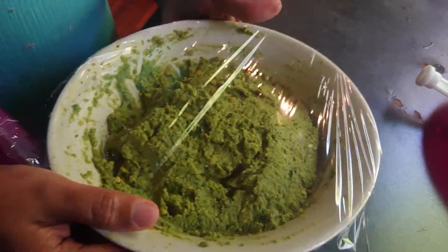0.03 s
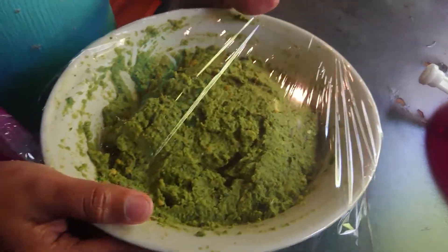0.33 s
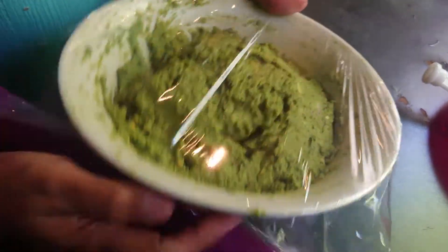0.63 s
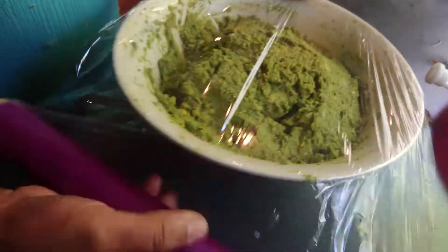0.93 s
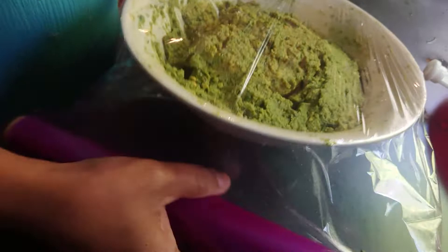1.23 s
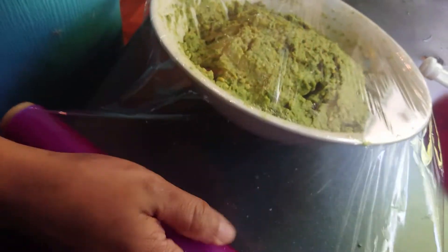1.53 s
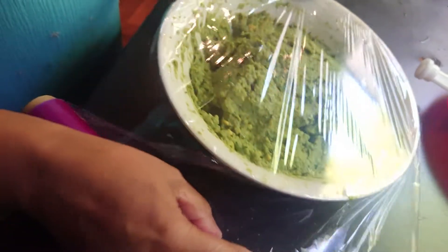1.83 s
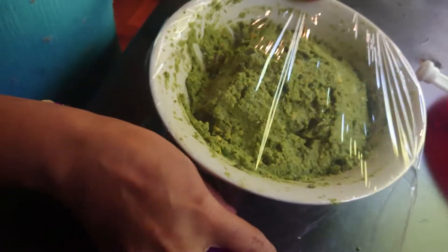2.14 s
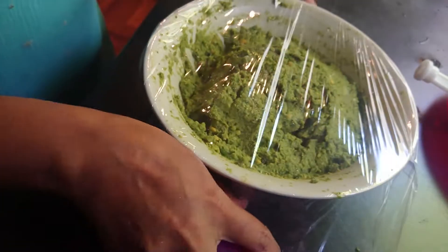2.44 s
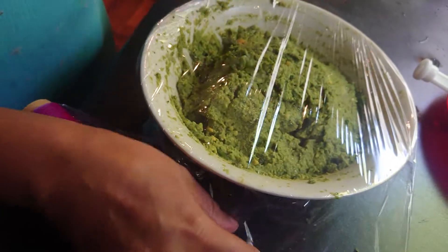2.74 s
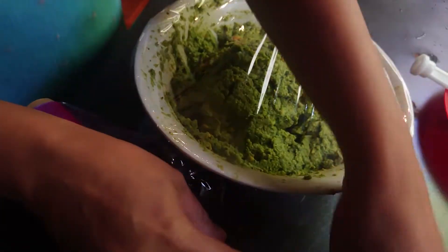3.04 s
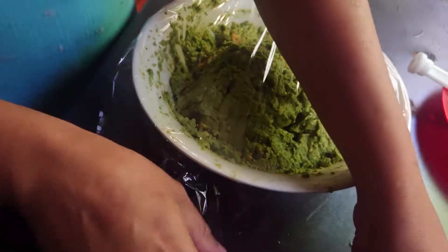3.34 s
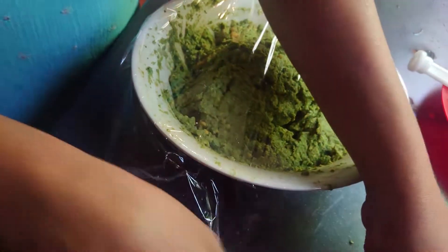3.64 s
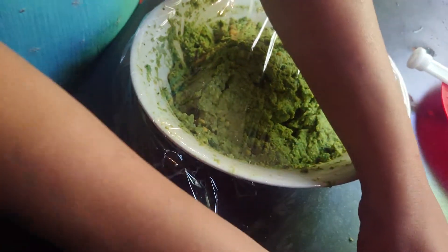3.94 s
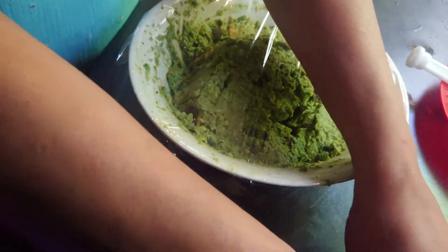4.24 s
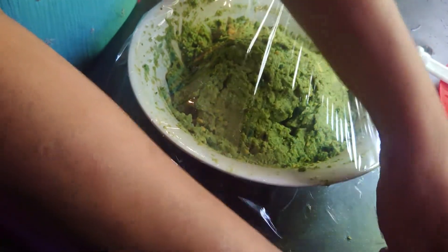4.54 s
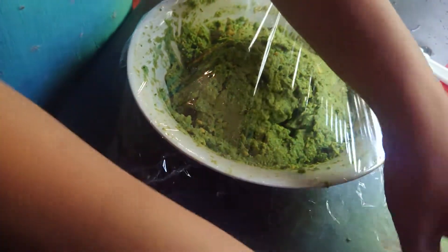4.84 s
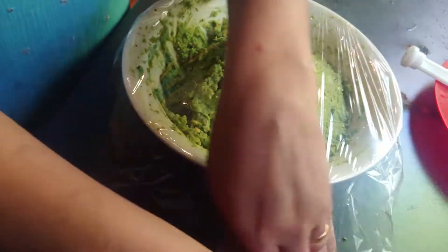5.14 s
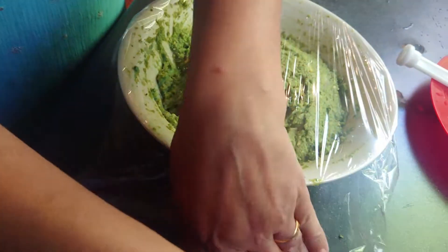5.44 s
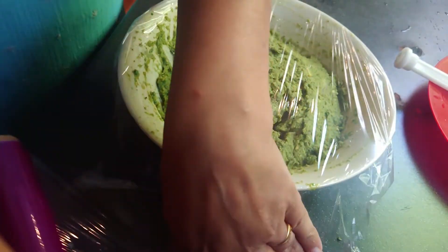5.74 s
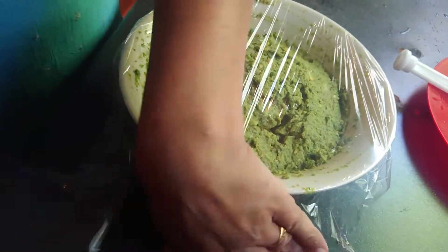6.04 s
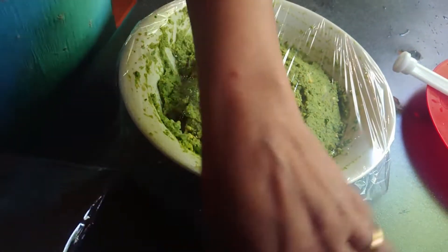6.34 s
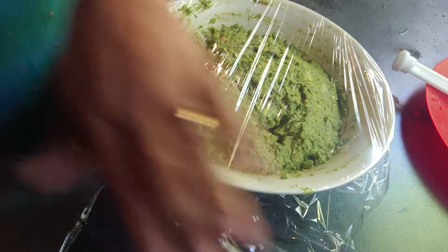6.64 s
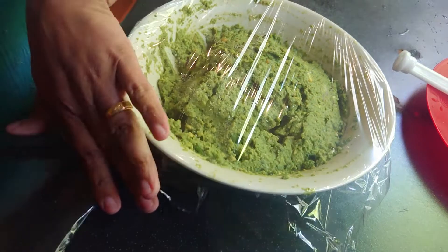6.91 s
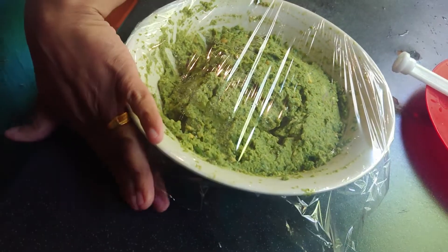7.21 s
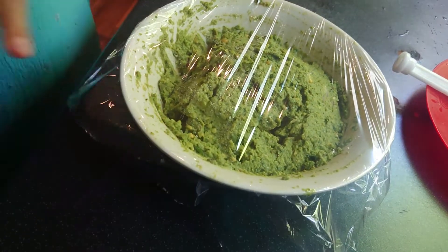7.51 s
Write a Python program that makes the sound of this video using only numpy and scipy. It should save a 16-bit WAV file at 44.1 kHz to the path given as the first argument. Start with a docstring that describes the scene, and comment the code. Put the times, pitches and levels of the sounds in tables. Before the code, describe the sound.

Plastic cling film is stretched over a bowl, heard close up in a small, slightly echoing kitchen. Soft rustling and rubbing run throughout over a faint low rumble. The loose film crinkles at about 0.7 seconds, and a soft knock on the counter follows at 1 second. The taut sheet then jerks free with sharp, hollow pops like a slack drum at about 1.3, 1.9, 2.4 and 3.5 seconds, the last with a bright crack. At 3.1 seconds the film gives a short, high squeak on the rim. A faint creak and crinkle come near 4.4 seconds. The film squeaks under a pulling hand at 5.6 seconds, then gives a lower, rough creak at 6 seconds amid a cluster of dull knocks from bowl and roll. A light bump comes at 6.6 seconds and one more high squeak at 7, before the crackling thins out.

```python
"""Cling film is pulled off its roll and stretched over a bowl in a small, live kitchen, close to a phone.
First the loose film rustles and crinkles as its folds buckle; bowl and roll knock softly on the counter.
From 1.3 s to 3.5 s the taut sheet jerks free four times, popping like a slack drum as clinging edges
crack apart; at 3.1 s it squeaks on the rim by stick-slip friction. It creaks at 4.4 s, then slips under
the pulling hand (5.6 s), the palm (6 s) and the fingers (7 s), while rustling and knocking go on."""
import sys
import numpy as np
from scipy import signal
from scipy.fft import rfft, irfft, next_fast_len
from scipy.io import wavfile
from scipy.ndimage import uniform_filter1d

SR = 44100
rng = np.random.default_rng(int(sys.argv[2]) if len(sys.argv) > 2 else 0)


def generate_wav(sig):
    """Save sig (samples, or channels by samples) to the path in sys.argv[1] as 16-bit PCM at SR."""
    pcm = np.round(np.clip(np.atleast_2d(sig).T, -1, 1) * 32767).astype(np.int16)
    wavfile.write(sys.argv[1], SR, pcm)


N = 342657
T = np.arange(N) / SR
SHORT = T[:16384]  # time axis of one brief event [s]
TOP_HZ = 16000
LEFT_RIGHT = np.array([[1], [-1]])


def undb(db):
    """Amplitude ratio of a level in decibels."""
    return 10 ** (np.asarray(db) / 20)


def unit(x):
    """Normalisation to an rms of 1."""
    return x / np.sqrt(np.mean(x ** 2) + 1e-30)


def at_energy(x, db):
    """Energy normalisation: a transient gets the energy of 10 ms at the given level."""
    return x * undb(db) / np.sqrt(np.sum(x ** 2) / (SR / 100))


def along(curve, t):
    """Linear interpolation of (time, value) points."""
    return np.interp(t, *np.transpose(curve))


def by_hz(points, hz):
    """Interpolation of (frequency, value) points on a logarithmic frequency axis."""
    f, value = np.transpose(points)
    return np.interp(np.log(np.maximum(hz, 1)), np.log(f), value)


def colour(x, points):
    """Spectral shaping by (frequency, gain) points."""
    size = next_fast_len(x.shape[-1])
    gain = undb(by_hz(points, np.fft.rfftfreq(size, 1 / SR)))
    return irfft(rfft(x, size) * gain, size)[..., :x.shape[-1]]


def resonate(x, hz, q):
    """Forced response of a damped oscillator: a two-pole band-pass."""
    return signal.lfilter(*signal.iirpeak(min(hz, SR / 3), max(q, hz / SR * 3), fs=SR), x)


def cut(x, hz, kind, order):
    """Band limiting by a maximally flat filter."""
    return signal.sosfilt(signal.butter(order, hz, kind, fs=SR, output="sos"), x)


def add(out, s, x, pan_db=0, lag_s_per_db=6e-5):
    """Superposition from time s on: the nearer microphone receives the sound louder and sooner."""
    for channel, side in zip(out, (1, -1)):
        i = max(int((s - side * pan_db * lag_s_per_db / 2) * SR), 0)
        part = x[:N - i]
        channel[i:i + len(part)] += undb(side * pan_db / 2) * part


def clicks(per_s, spread_db, size):
    """Shot noise of buckling: impulses at random moments, many small and a few large."""
    heights = undb(spread_db * np.minimum(rng.exponential(size=size), 5))
    signs = rng.choice([-1, 1], size)
    return heights * signs * (rng.random(size) < per_s / SR)


def whiten(response, smooth_bins=50):
    """Minimum-phase equalisation: flattens a response's broad colour and keeps its fine echo pattern."""
    length = response.shape[-1]
    spectrum = rfft(response)
    power = uniform_filter1d(abs(spectrum) ** 2, smooth_bins)
    cepstrum = irfft(-np.log(power) / 2, length)
    cepstrum *= 1 + np.sign(np.fft.fftfreq(length))  # causal part only
    return irfft(spectrum * np.exp(rfft(cepstrum)), length)


# Spectrum of the still air: (frequency [Hz], relative level [dB])
AIR_SPECTRUM = [(30, -10.5), (70, -21), (200, -1), (500, -3.5), (1000, -1.5), (4000, -9.5), (8000, -31.5),
                (16000, -15.5)]
# Spectrum of the counter's rumble: (frequency [Hz], relative level [dB])
RUMBLE_SPECTRUM = [(20, -17), (40, -5.5), (65, 1.5), (90, -8.5), (170, -12), (260, -19.5), (600, -34.5),
                   (2000, -58.5)]
# Envelope of that rumble: (time [s], relative level [dB])
RUMBLE_LEVELS = [(0.0, -62.5), (0.43, -71), (2.14, -66.5), (3.05, -72.5), (3.53, -63.5), (3.89, -70),
                 (5.93, -71.5), (6.14, -71), (6.36, -67), (7.77, -76)]
def background(rumble_gain_db=4, air_db=-71, side_db=-15):
    """Random vibration: things shifting on the counter rumble over the noise floor of the room."""
    mid, side = unit(colour(rng.standard_normal((2, N)), RUMBLE_SPECTRUM))
    rumble = (mid + undb(side_db) * side * LEFT_RIGHT) * undb(along(RUMBLE_LEVELS, T) + rumble_gain_db)
    air = undb(air_db) * unit(colour(rng.standard_normal((2, N)), AIR_SPECTRUM))
    return rumble + air


# Reverberation of the kitchen: (frequency [Hz], time to fall 60 dB [s])
REVERB_TIMES = [(60, 0.75), (200, .42), (600, 0.38), (1500, 0.41), (5000, 0.32), (14000, 0.51)]
# Its standing waves: (frequency [Hz], relative level [dB], time to fall 60 dB [s])
ROOM_MODES = [(65, -2, 0.45), (170, 11.5, .42), (308, 2, 0.42), (338, -3, .36), (705, -1.5, .34),
              (875, -3, 0.2)]
def kitchen(x, early_db, tail_db, modes_db, early_s, coherence_hz, build_s=0.013):
    """Convolution with the room: direct sound, reflections off counter and bowl, tail, standing waves."""
    t = T[:SR // 2]
    hz = np.fft.rfftfreq(len(t), 1 / SR)
    mid, side = rfft(rng.standard_normal((2, len(t))))
    coherence = 1 / (1 + (hz / coherence_hz) ** 2)  # long waves reach both microphones alike
    field = mid * np.sqrt(1 + coherence) + side * np.sqrt(1 - coherence) * LEFT_RIGHT
    response = np.zeros((2, len(t)))
    edges = np.r_[0, np.geomspace(120, SR / 2, 16)]
    for lo, hi in zip(edges, edges[1:]):
        band = irfft(field * ((hz >= lo) & (hz < hi)), len(t))
        early = band * t * np.exp(-2 * t / early_s)
        t60 = by_hz(REVERB_TIMES, (lo + hi) / 2)
        tail = band * (1 - np.exp(-t / build_s)) * np.exp(-np.log(1000) * t / t60)
        band_weight = np.sqrt((hi - lo) / (SR / 2) / len(t))
        response += (undb(early_db) * unit(early) + undb(tail_db) * unit(tail)) * band_weight
    response[:, 0] += 1  # direct sound
    response = whiten(response)
    for mode_hz, db, t60 in ROOM_MODES:
        loss = np.log(1000) / t60
        ring = np.exp(-loss * t) * np.sin(2 * np.pi * mode_hz * t)
        response += undb(db + modes_db) * 2 * loss / SR * ring
    return signal.oaconvolve(x, response, axes=1)[:, :N]


def swell(s, length, rise_share=.52):
    """Power envelope of a hand stroke: a bell curve peaking at time s."""
    width = length * np.where(T < s, rise_share, 1 - rise_share)
    return np.exp(-np.minimum(abs(T - s) / width, 10) ** 2)


# Where the hands work the film: (time [s], left minus right [dB])
HAND_PAN = [(0, -1.5), (.7, 2), (1.0, -2), (5.3, -3), (5.7, -1.5), (6.1, -5.5), (6.5, 2.5), (7.7, -2)]
# Strokes on the loose film: (peak time [s], relative crackle [dB], length [s], relative rub [dB])
HAND_STROKES = [(.03, -63, .06, -70.5), (0.354, -65, .07, -90), (.50, -74, .06, -82),
                (0.642, -59.5, .07, -85), (0.725, -55.5, .05, -67), (0.967, -62, .08, -64),
                (1.19, -68.5, .04, -69), (1.288, -68.5, .05, -64), (1.481, -66, .12, -67),
                (1.717, -66, .05, -70), (2.211, -65, .08, -66), (2.31, -64.5, .07, -81),
                (2.40, -70.5, .05, -75), (2.632, -61.5, .06, -61.5), (2.818, -71, .08, -64.5),
                (3.17, -65.5, 0.11, -63), (3.425, -57, .05, -67), (3.97, -69.5, .06, -77),
                (4.239, -69.5, .1, -63), (4.452, -74.5, .09, -69), (4.623, -63, .04, -58),
                (4.70, -65.5, .07, -68.5), (4.865, -81.5, .12, -80.5), (5.076, -82.5, .1, -69),
                (5.14, -65, .07, -70.5), (5.60, -69, .06, -65), (5.724, -63, .05, -54.5),
                (5.881, -86, 0.12, -59.5), (6.047, -59, 0.092, -62.5), (6.241, -69, .14, -89),
                (6.401, -67.5, .09, -85.5), (6.535, -79.5, .04, -63), (6.815, -66.5, .05, -60),
                (6.893, -68, .1, -85), (7.025, -65, .025, -71), (7.158, -78, 0.14, -63.5),
                (7.38, -74, .05, -73), (7.744, -67, .03, -88.5)]
def rubbing(gain_db=-6.0, rub_hz=850, usual_s=.06, slowing=.75, q=1.1, band_ratio=4.7):
    """Sliding friction: skin drags over film in dense, dull catches; a slower stroke sounds lower."""
    catches = clicks(per_s=6000, spread_db=2, size=N)
    rub = np.zeros(N)
    for s, _, length, db in HAND_STROKES:
        hz = np.clip(rub_hz * (usual_s / length) ** slowing, 300, 1800)
        drag = cut(resonate(catches, hz, q), [hz / band_ratio, hz * band_ratio], "band", order=1)
        rub += unit(drag) * undb(db + gain_db) * np.sqrt(swell(s, length))
    return rub * undb(along(HAND_PAN, T) / 2 * LEFT_RIGHT)


# Steady crackle of film that is never quite still: (time [s], relative level [dB])
STEADY_CRACKLE = [(0.0, -78), (0.26, -73.5), (0.78, -71.5), (1.77, -77.5), (2.23, -71), (2.99, -79),
                  (3.38, -72), (3.79, -80.5), (4.46, -75.5), (5.52, -84.5), (6.3, -74.5), (6.56, -86),
                  (6.79, -88), (7.01, -70), (7.44, -81), (7.77, -86.5)]
# Spectrum of the loose film: (frequency [Hz], relative level [dB])
RUSTLE_SPECTRUM = [(100, -17), (300, -18.5), (800, 2), (1500, -5), (3000, -1), (5000, -0.5), (7000, -7),
                   (11000, -8.5), (16000, -10)]
def rustle(gain_db=-6, steady_db=2.5, usual_per_s=320, spread_db=4.0, pan_db=-2.5, width_db=5.0):
    """Random buckling: three patches of loose film crackle, faster and louder when handled harder."""
    stroke_power = sum(undb(db) ** 2 * swell(s, length) for s, db, length, _ in HAND_STROKES)
    steady_power = undb(along(STEADY_CRACKLE, T) + steady_db) ** 2
    level_db = 10 * np.log10(steady_power + stroke_power)  # incoherent sources add in power
    rate = usual_per_s * undb((level_db - level_db.mean()) / 2)
    out = np.zeros((2, N))
    for place in (-1, 0, 1):
        patch = unit(colour(clicks(rate, spread_db, N) / np.sqrt(rate), RUSTLE_SPECTRUM))
        add(out, 0, patch * undb(level_db + gain_db), pan_db + place * width_db)
    return out


# Contacts of bowl, roll and hands: (time [s], relative level [dB], frequency [Hz], decay time [s])
SOFT_KNOCKS = [(.004, -51.5, 66.5, 0.029), (0.945, -53, 373, 0.0064), (.994, -40.5, 91.5, 0.0037),
               (.996, -42.5, 447, 0.0022), (1.059, -60.5, 75, 0.07), (1.517, -54.5, 454, 0.0041),
               (1.633, -61.5, 189, 0.0073), (3.104, -48, 196.5, .007), (3.367, -53.5, 151, 0.015),
               (3.4, -50, 107, .027), (3.860, -60.5, 97, 0.028), (4.374, -60, 66, 0.022),
               (5.8032, -46.5, 374, 0.0052), (5.8452, -44.5, 374, 0.0072), (5.952, -38.5, 185.3, 0.03),
               (5.975, -42, 70, 0.019), (6.017, -37, 90, 0.0084), (6.018, -44, 181, 0.016),
               (6.064, -43, 189, 0.0234), (6.107, -50, 115, 0.014), (6.16, -65, 129.4, 0.048),
               (6.252, -59, 102.5, 0.057), (6.573, -47.5, 351, 0.0047), (6.613, -54.5, 342, .012),
               (6.80, -64, 84.6, 0.014)]
def knocks(rise_cycles=0.18):
    """Damped vibration after a padded impact: a softer contact is both lower and slower to build."""
    out = np.zeros((2, N))
    for s, db, hz, decay in SOFT_KNOCKS:
        rise = 1 - np.exp(-(SHORT * hz / rise_cycles) ** 2)
        envelope = rise * np.exp(-SHORT / decay)
        add(out, s, undb(db) * envelope / envelope.max() * np.sin(2 * np.pi * hz * SHORT))
    return out


# Collapsing folds, and at 5.80 s and 5.85 s the dull knocks of the roll being set down: (time [s], relative
# level [dB], decay time [s], centre [Hz], fizz re ring [dB])
FOLDS = [(.024, -58, 0.0034, 2500, 13), (0.29, -62, .003, 1370, -13), (0.366, -58, 0.01, 1630, -26),
         (.477, -56, .008, 1240, 6), (0.728, -38, 0.0085, 2960, -3), (0.739, -38.5, 0.0049, 860, -18),
         (.991, -44, 0.01, 1204, -10), (1.513, -43.5, 0.0058, 820, -15.5), (1.632, -51, 0.0038, 1160, -23),
         (1.961, -57, .006, 1690, -12), (2.211, -58, 0.0048, 2530, -20), (2.404, -51.5, 0.0048, 1020, -20),
         (3.4379, -43, 0.0097, 905, -14.5), (4.338, -44, 0.0044, 2930, 6), (4.605, -54, 0.0079, 1390, 1),
         (4.629, -62, 0.0074, 1405, -22), (5.161, -44, 0.0026, 1480, -20), (5.31, -60.5, 0.0054, 1150, -13),
         (5.575, -56, 0.0019, 3390, -38), (5.754, -44, 0.00092, 3340, -20.5), (5.803, -52, 0.015, 810, -36),
         (5.8453, -54, 0.015, 800, -21), (6.107, -57.5, .0046, 1390, 17), (6.152, -60.5, 0.015, 1980, -24),
         (6.416, -59, 0.0015, 2580, -27), (6.753, -66, 0.005, 3460, 2.5), (6.826, -55.5, 0.0024, 1540, -2)]
def crinkles(rise_s=.0009, fold_q=1.0, top_ratio=4.8):
    """Buckling cascade: a fold gives way in a swelling and dying volley of clicks that ring it briefly."""
    out = np.zeros((2, N))
    lead = 4 * rise_s
    t = SHORT - lead
    for s, db, decay, hz, fizz_db in FOLDS:
        envelope = np.exp(-np.maximum(-t / rise_s, t / decay))
        volley = clicks(per_s=12000, spread_db=2, size=len(SHORT)) * envelope
        drive = cut(volley, [hz / 3, min(hz * top_ratio, TOP_HZ)], "band", order=2)
        sound = unit(resonate(drive, hz, fold_q)) + undb(fizz_db) * unit(volley)
        rms = np.sqrt(np.mean(envelope ** 2)) * undb(db)
        add(out, s - lead, unit(sound) * rms, along(HAND_PAN, s))
    return out


# Edges parting: (time [s], relative level [dB], centre [Hz], decay time [s], left minus right [dB])
EDGE_CRACKS = [(0.8512, -60, 7060, .0006, 2.5), (0.995, -44.5, 2700, 0.0053, -4.5),
               (1.3093, -34.5, 2000, 0.0047, 1.5), (1.3415, -42.5, 5100, 0.0011, -0.5),
               (1.917, -50, 1980, 0.0041, 1.5), (2.444, -44, 2150, 0.0035, 1),
               (3.4628, -22, 2607, 0.00084, -7.5), (4.3394, -49, 4540, 0.00061, -1.5),
               (5.3073, -52, 1480, 0.00071, -1.5), (6.1094, -52.5, 1660, 0.0029, -3.5),
               (6.441, -54, 2860, 0.0019, -2.5), (7.1967, -51.5, 4400, 0.00034, 6.5)]
def cracks(q=0.61, top_ratio=2.0):
    """Adhesive failure: a clinging edge tears away in a bright noise burst of a few milliseconds."""
    out = np.zeros((2, N))
    for s, db, hz, decay, pan_db in EDGE_CRACKS:
        burst = rng.standard_normal(len(SHORT)) * np.exp(-SHORT / decay)
        tear = cut(resonate(burst, hz, q), min(hz * top_ratio, TOP_HZ), "low", order=1)
        add(out, s, at_energy(tear, db), pan_db)
    return out


def stick_slip(path, film_hz, q, jitter, scrape_db, pan_db):
    """Relaxation oscillation: the film grips and slips, each slip a pulse into the sheet's resonance."""
    s, hz, db = np.transpose(sorted(path))
    t = np.arange(s[0], s[-1], 1 / SR)
    waver = unit(uniform_filter1d(rng.standard_normal(len(SHORT)), size=40))[:len(t)]
    rate = np.interp(t, s, hz) * (1 + jitter * waver)
    phase = 2 * np.pi * np.cumsum(rate) / SR
    slips = sum(np.cos(k * phase) * (k * rate < TOP_HZ) / np.sqrt(k) for k in np.arange(1, 25))
    scrape = rng.standard_normal(len(SHORT))[:len(t)] * (1 + np.cos(phase))  # noise at each slip
    sound = resonate(unit(slips) + undb(scrape_db) * scrape, film_hz, q)
    out = np.zeros((2, N))
    add(out, s[0], unit(sound) * undb(np.interp(t, s, db)), pan_db)
    return out


# Film slipping on the rim: (time [s], slip rate [Hz], relative level [dB])
RIM_SLIPS = [(3.1030, 3000, -55), (3.1045, 2920, -35), (3.111, 2480, -31), (3.119, 2420, -31),
             (3.122, 1950, -41), (3.133, 2100, -45), (3.137, 2380, -35), (3.142, 2420, -27.5),
             (3.145, 2400, -48)]
def rim_squeak():
    """Stick-slip friction against the bowl's rim: one short, high chirp."""
    return stick_slip(RIM_SLIPS, film_hz=2850, q=1.5, jitter=.06, scrape_db=-6.5, pan_db=0.5)


# Film slipping as it is held, pulled, pressed, fingered: (time [s], slip rate [Hz], relative level [dB])
HOLD_SLIPS = [(4.427, 1080, -50), (4.431, 1046, -44), (4.436, 1015, -58), (4.441, 985, -41.5),
              (4.446, 1035, -48), (4.452, 920, -63)]
PULL_SLIPS = [(5.6425, 1760, -40), (5.644, 2196, -32.5), (5.649, 3095, -28.5), (5.653, 2725, -43),
              (5.6555, 1745, -27.5), (5.660, 1390, -51)]
PALM_SLIPS = [(5.964, 499, -29), (5.971, 519.5, -29), (5.976, 603, -23), (5.9795, 767, -24.5),
              (5.982, 760, -62)]
FINGER_SLIPS = [(7.029, 1580, -44), (7.032, 1610, -30), (7.042, 1735, -30), (7.049, 1610, -26.5),
                (7.061, 1590, -25.5), (7.067, 1780, -27), (7.071, 2200, -37), (7.090, 1950, -39),
                (7.104, 1740, -43)]
def hand_squeaks():
    """Stick-slip friction against skin: fast slips squeak, slow ones creak, muffled by the hand."""
    pull = stick_slip(PULL_SLIPS, film_hz=3600, q=0.57, jitter=0.044, scrape_db=-10.5, pan_db=1.5)
    hold = stick_slip(HOLD_SLIPS, film_hz=1580, q=0.99, jitter=0.049, scrape_db=-11, pan_db=-3.5)
    palm = stick_slip(PALM_SLIPS, film_hz=1900, q=0.97, jitter=0.181, scrape_db=5.5, pan_db=2.5)
    finger = stick_slip(FINGER_SLIPS, film_hz=3520, q=2.0, jitter=.022, scrape_db=-9, pan_db=2)
    return pull + cut(hold + palm, 4230, "low", order=2) + cut(finger, 1750, "high", order=2)


# The sheet jerking free: (time [s], relative level [dB], lower mode [Hz], upper mode [Hz],
# upper re lower mode [dB], air push re lower mode [dB], left minus right [dB])
SHEET_JERKS = [(1.311, -24, 405, 945, 4, -14, -3.5), (1.9147, -16.5, 250, 756, -5.5, -5, -3),
               (2.4431, -18.5, 270, 994, -2.5, -11, -2.5), (3.4608, -19.5, 428, 890, 7.5, -23.5, -2),
               (3.4640, -20.5, 800, 1590, 7.5, -18, -4)]
def pops(lower_q=1.4, upper_q=2.4, top_ratio=1.86, push_hz=80):
    """Impulse response of a membrane: a jerk rings the sheet's two broad modes and shoves the air."""
    out = np.zeros((2, N))
    jerk = signal.unit_impulse(len(SHORT))
    for s, db, lower_hz, upper_hz, upper_db, push_db, pan_db in SHEET_JERKS:
        lower = cut(resonate(jerk, lower_hz, lower_q), upper_hz, "low", order=2)
        upper = cut(resonate(jerk, upper_hz, upper_q), upper_hz * top_ratio, "low", order=4)
        push = cut(resonate(jerk, push_hz, q=0.51), lower_hz, "low", order=2)
        pop = at_energy(lower, db) - at_energy(upper, db + upper_db) + at_energy(push, db + push_db)
        add(out, s, pop, pan_db)
    return out


def scene():
    """Direct-to-reverberant ratio: the wide sheet fills the room; small, near sounds are drier."""
    chirp = rim_squeak()
    sheet = kitchen(pops(), early_db=0, tail_db=2, modes_db=3.5, early_s=.0097, coherence_hz=670)
    edge = kitchen(cracks(), early_db=-2, tail_db=-7, modes_db=-12, early_s=.003, coherence_hz=700)
    rim = kitchen(chirp, early_db=-7, tail_db=-9, modes_db=-10, early_s=.004, coherence_hz=800)
    squeaks = hand_squeaks()
    hands = kitchen(squeaks, early_db=5.5, tail_db=-3.5, modes_db=4.5, early_s=.0047, coherence_hz=800)
    touches = crinkles() + knocks() + rustle() + rubbing()
    bowl = kitchen(touches, early_db=1.5, tail_db=-5, modes_db=-10.5, early_s=.0048, coherence_hz=790)
    return undb(-2) * sheet + undb(2.5) * edge + rim + undb(3.5) * hands + undb(9) * bowl + background()


def record(dry, bass_hz=51.0):
    """Frequency response of the phone: no deep bass, a notch in the treble and a steep cut at the top."""
    notch = [(7000, 0), (7600, -18), (9200, -20), (9800, 0)]  # (frequency [Hz], gain [dB])
    heard = colour(cut(dry, bass_hz, "high", order=6), notch)
    return signal.sosfilt(signal.ellip(8, .2, 70, TOP_HZ, fs=SR, output="sos"), heard)


dry = scene()
out = record(dry)
generate_wav(out)
```